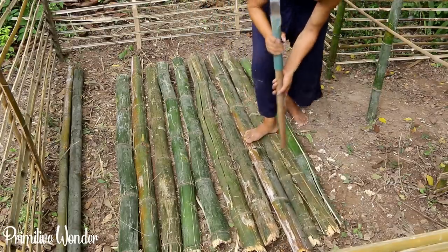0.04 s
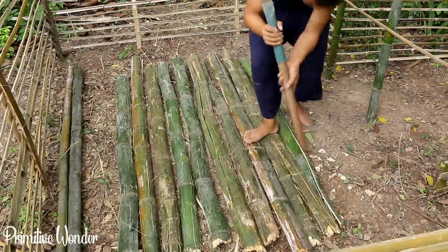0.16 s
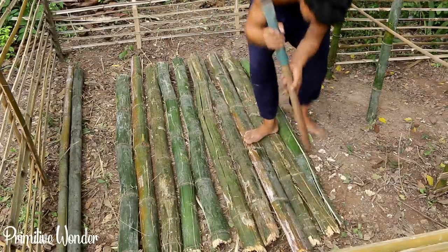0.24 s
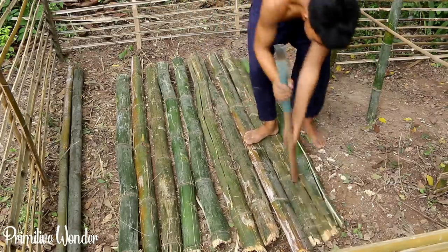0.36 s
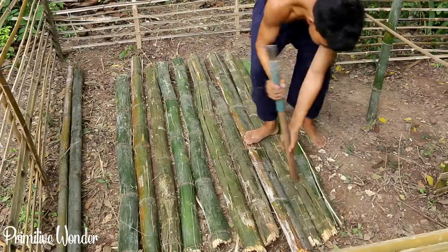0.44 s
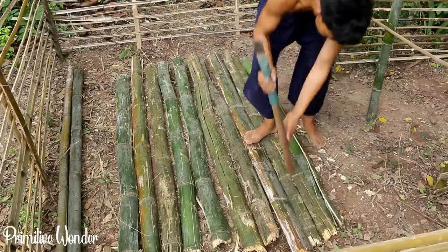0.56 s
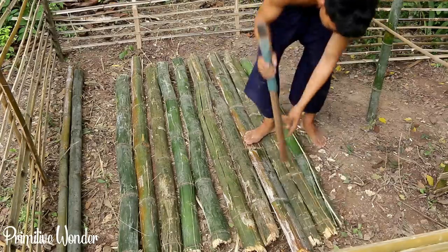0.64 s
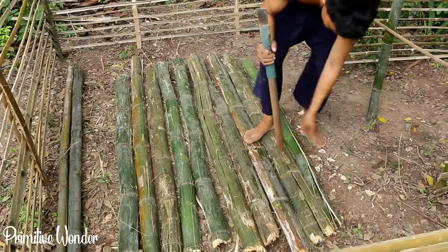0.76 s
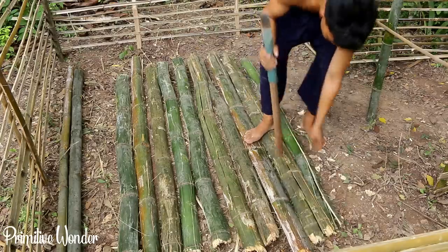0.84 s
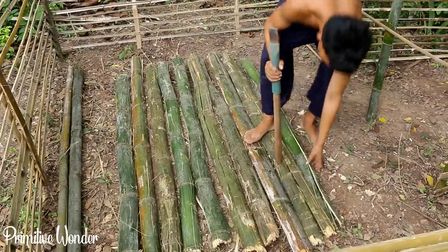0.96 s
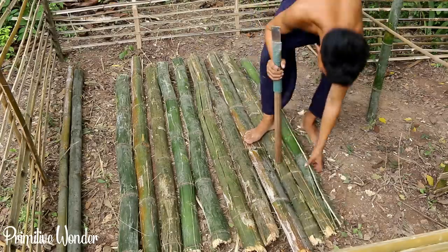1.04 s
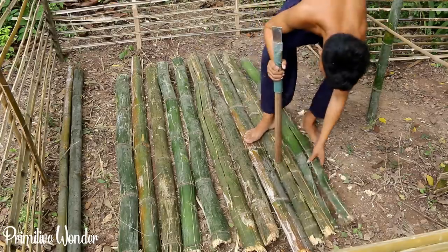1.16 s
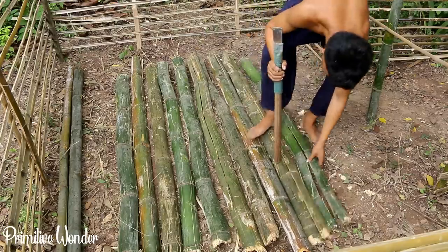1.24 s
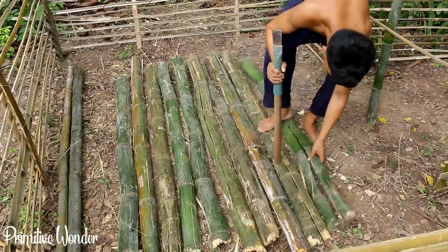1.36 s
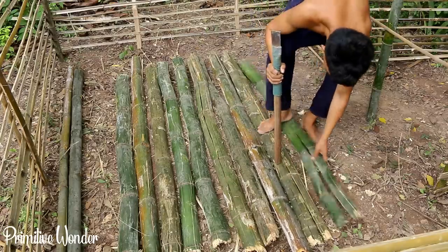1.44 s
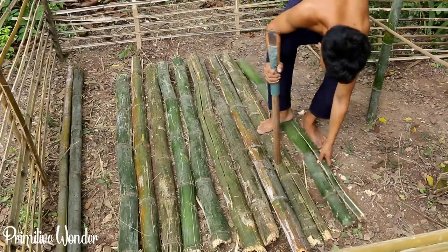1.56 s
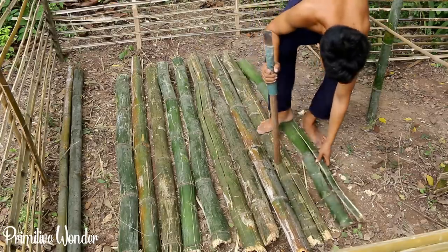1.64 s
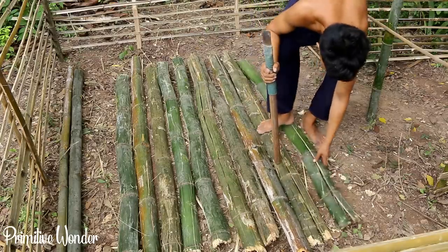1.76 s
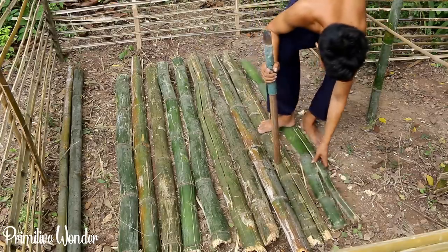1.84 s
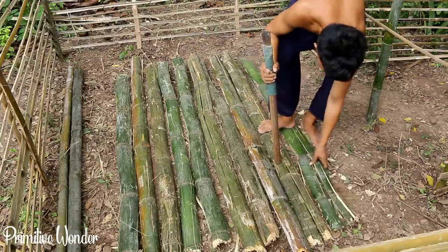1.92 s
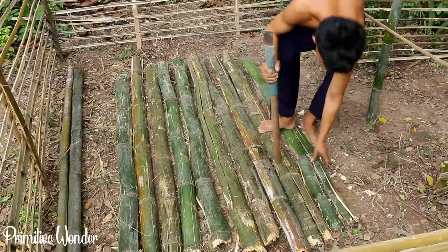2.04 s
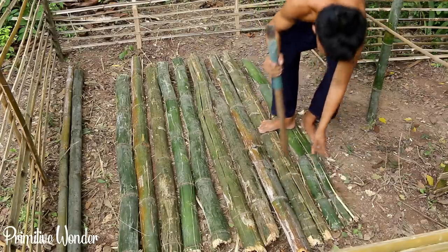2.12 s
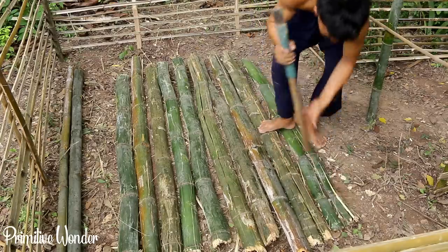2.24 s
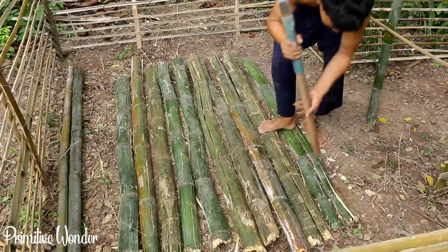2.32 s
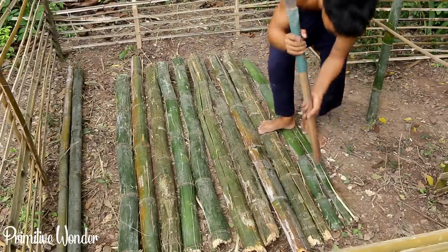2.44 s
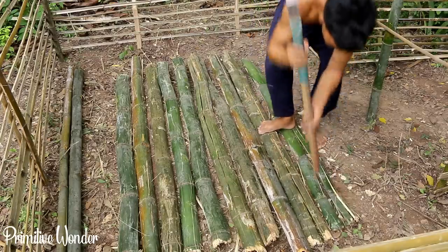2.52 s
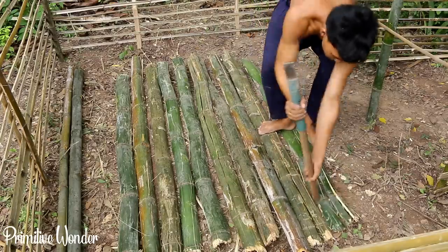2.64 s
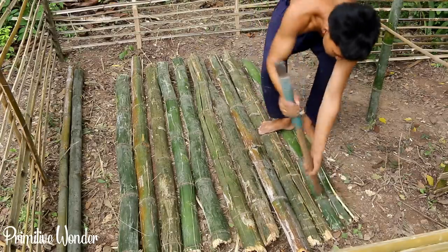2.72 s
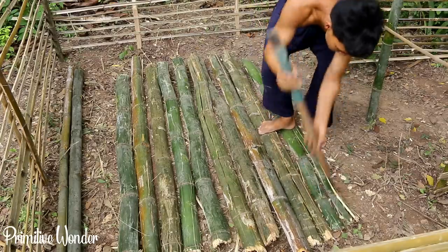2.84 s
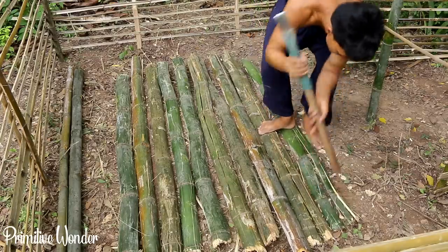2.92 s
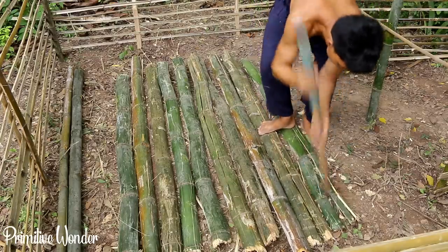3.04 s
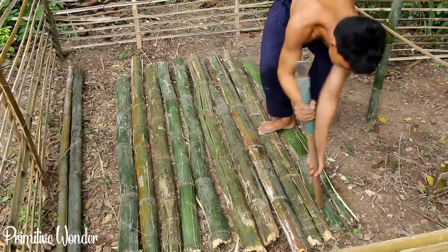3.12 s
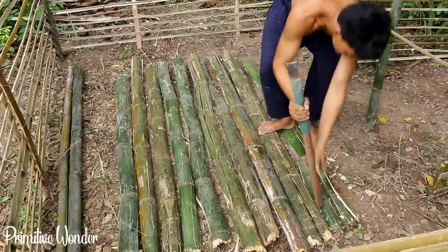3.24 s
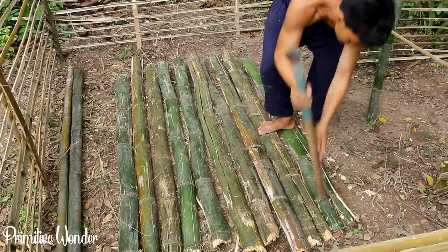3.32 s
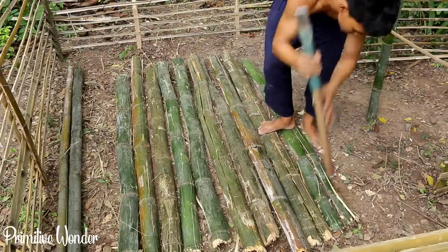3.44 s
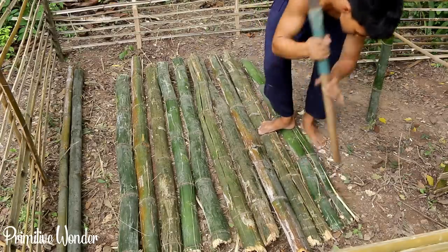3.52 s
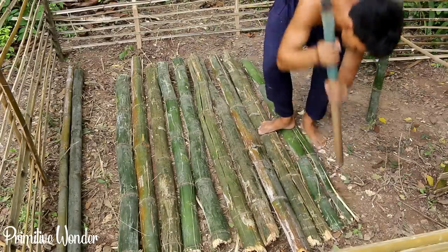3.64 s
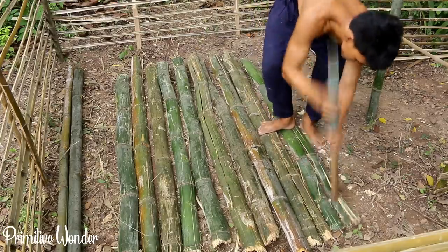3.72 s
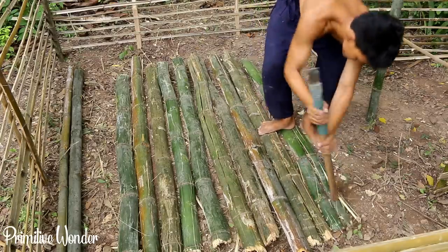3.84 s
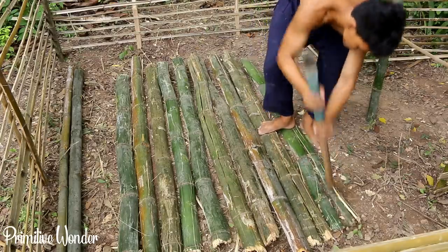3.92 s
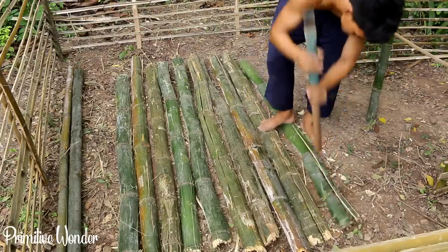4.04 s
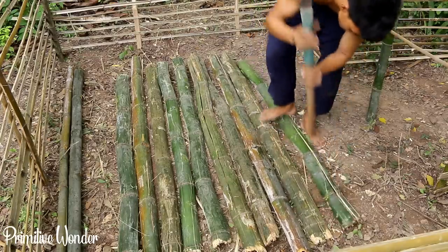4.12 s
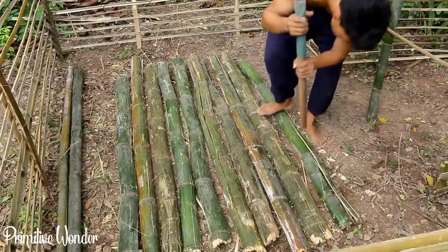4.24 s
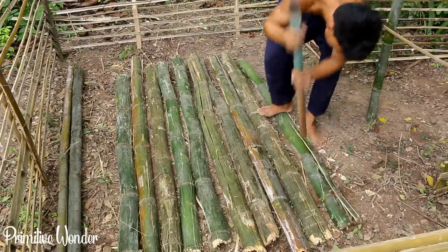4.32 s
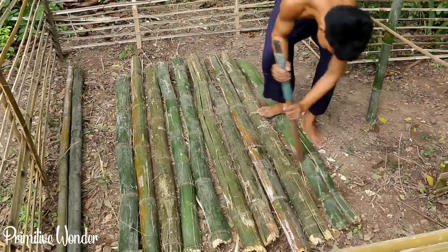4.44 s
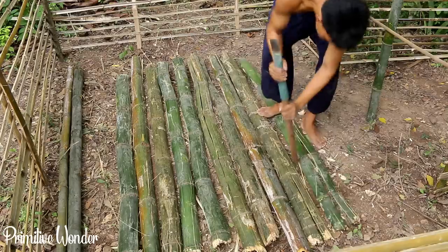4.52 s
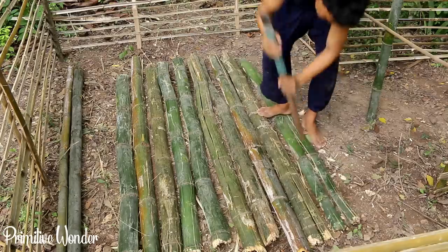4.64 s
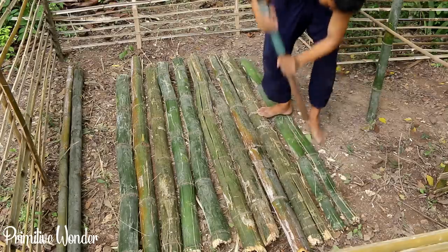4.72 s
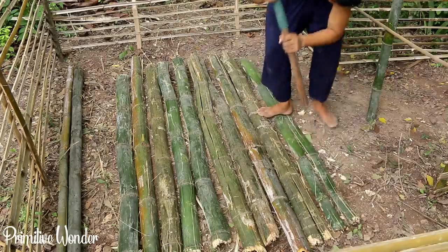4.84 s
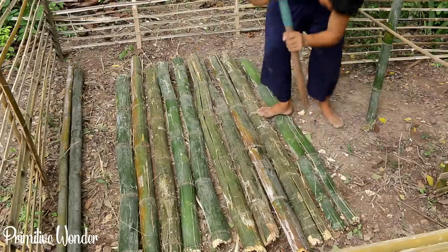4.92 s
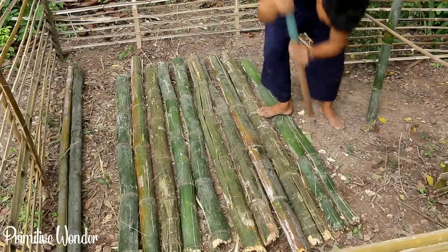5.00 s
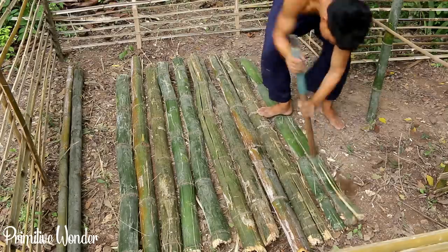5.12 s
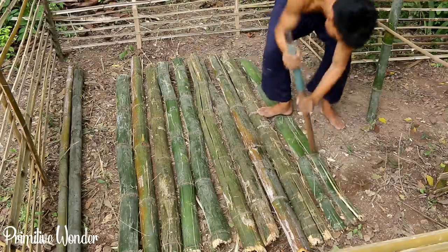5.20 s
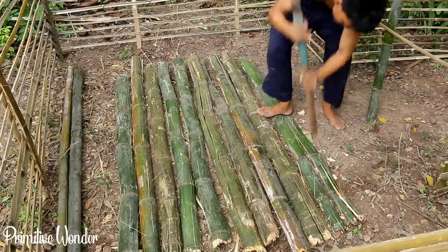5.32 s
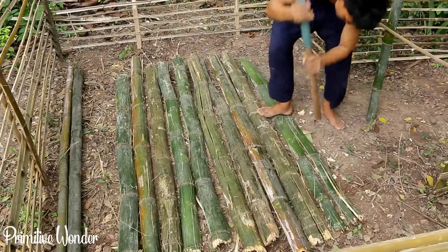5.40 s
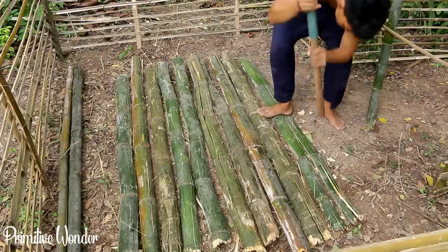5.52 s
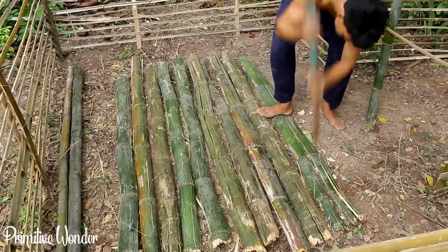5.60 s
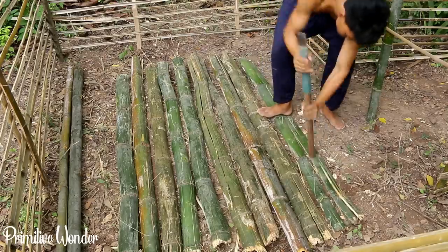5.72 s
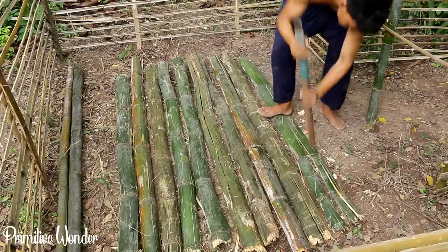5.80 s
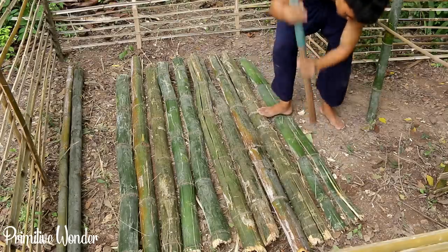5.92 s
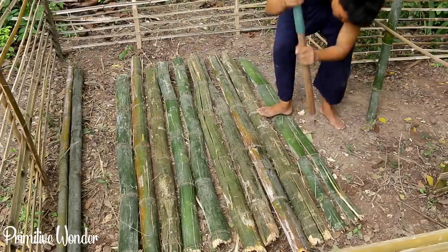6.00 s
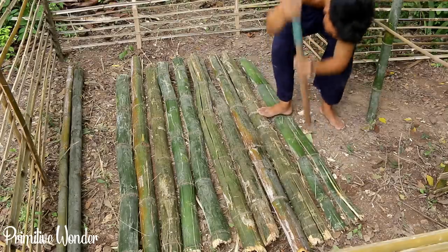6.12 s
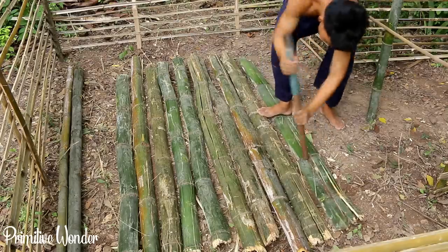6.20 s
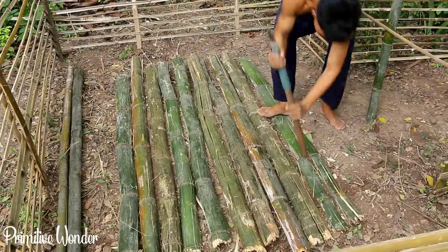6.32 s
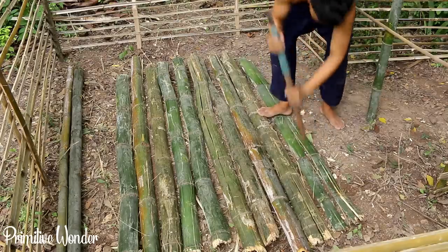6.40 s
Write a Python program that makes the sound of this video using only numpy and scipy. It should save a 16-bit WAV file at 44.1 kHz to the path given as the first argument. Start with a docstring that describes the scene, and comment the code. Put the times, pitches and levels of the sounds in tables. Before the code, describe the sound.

Loud, dry bamboo chops outdoors, miked close in stereo and slightly to the right. A strong crack and a lighter one come first, then dry leaves shuffle while a bird chips about every quarter second. From the middle onward blows land in steady rhythm, woody and splintery, with poles rattling between them. Brief scattered reflections and distant twittering surround the work; the loudest peaks may distort.

```python
"""Chopping green bamboo

A long-handled steel blade is driven nine times into green bamboo poles on bare earth, close by on the right.
Each chop layers crack, noise splinters, damped pole and blade modes and a ground thump; echo tails answer it.
Between chops poles tap and ring, and dry leaves rustle in enveloped noise grains.
Gliding whistles and narrow-band noise make the birds; shaped noise makes the open air. The peaks can clip."""
import sys
import numpy as np
from scipy import signal
from scipy.fft import rfft, irfft
from scipy.io import wavfile
from scipy.ndimage import uniform_filter1d

SR = 44100
rng = np.random.default_rng(int(sys.argv[2]) if len(sys.argv) > 2 else 0)


def int16_out(signal):
    """Quantize to a 16-bit WAV file."""
    q = np.round(np.clip(np.atleast_2d(signal).T, -1, 1) * 32767)
    wavfile.write(sys.argv[1], SR, q.astype(np.int16))


N = 284886

# Band centres of a chop: (frequency [Hz])
CHOP_BANDS = [150, 450, 950, 1500, 2600, 5000, 11000]
# Chops: (time [s], seven band levels before the chop trim [dB], pole pitch [factor], thump pitch [Hz],
# splintering [dB], send into the yard [dB])
CHOPS = [ (0.3433, -31.5, -27, -24, -26.5, -22, -28, -31.5, 0.98, 197, 9.5, -0.56),
         (0.9167, -53, -44.5, -27, -30.5, -25.5, -30.5, -46.5, 1.01, 150, 2, -2.7),
         (2.5939, -27.5, -33.5, -31.5, -23, -24, -34, -41.5, 1.03, 170, 1.5, -1.2),
         (3.0787, -32.5, -28, -30.5, -25, -22.5, -30, -37.5, 0.93, 182, -3, 0),
         (3.728, -30.5, -27, -26, -22.5, -23.5, -33.5, -38.5, 0.91, 151, -3.5, -0.36),
         (4.379, -38.5, -26, -24.5, -25, -26, -31.5, -36.5, 1.03, 132, 7, -0.66),
         (5.0934, -31, -25.5, -25, -20.5, -25, -33, -36.5, .95, 182, 5, -1.6),
         (5.6346, -27, -25.5, -24, -27, -21.5, -28, -35.5, 0.96, 237, 3, -2.2),
         (6.195, -29, -21.5, -23.5, -24, -26.5, -30, -37, 1.09, 158, 11.5, -0.36)]
# Hollow pole modes before the pitch factor: (frequency [Hz], relative level [dB], T60 [s])
POLE_MODES = [(240, -4, 0.059), (510, 6.5, 0.052), (789, 2, 0.034), (997, 5.5, 0.045), (1426, -0.5, 0.028),
              (2222, -5, 0.025), (2735, -12.5, 0.056)]
# Steel blade modes: (frequency [Hz], relative level [dB], T60 [s])
BLADE_MODES = [(3960, -4, 0.16), (4970, 4, 0.28), (6630, -11, 0.2), (7100, -13, .16), (9600, -15, .12),
               (9910, -14, .12)]
# Splitting fibres, a row per chop band: (level before each chop's splintering [dB], T60 [s])
SPLINTERS = [(-4, 0.093), (1, 0.055), (0, 0.032), (-8, 0.042), (-12.5, 0.1), (17, 0.057), (38, 0.04)]
# Band centres of a knock: (frequency [Hz])
KNOCK_BANDS = [450, 1300, 3800, 10000]
# Pole taps and snaps: (time [s], peak band level before the knock trim [dB], strongest frequency [Hz])
# A low strongest frequency gives a soft bump, a high one a dry snap.
KNOCKS = [(0.08, -49.5, 8000), (0.267, -42, 4500), (0.51, -44.5, 704), (0.623, -35.5, 2100),
          (0.638, -43, 1600), (0.688, -43.5, 5800), (0.787, -48.5, 3200), (1.234, -59, 1200),
          (1.252, -47, 650), (2.062, -55.5, 3800), (3.035, -44, 520), (3.88, -50.5, 11000),
          (4.285, -47.5, 350), (4.425, -37.5, 850), (4.455, -45, 500), (4.475, -41.5, 1000),
          (4.507, -47, 1400), (4.631, -49, 10000), (4.641, -49.5, 7500), (4.698, -54.5, 3600)]
KNOCK_BELOW_DB, KNOCK_ABOVE_DB = 7, 8.5  # fall per octave below and above the strongest frequency

# Colours of near scatter, fence echo and far woods: (frequency [Hz], level [dB])
SCATTER = [(100, -5.5), (500, -17), (1200, -12.5), (2600, -11), (5000, -5.5), (11000, -3.5), (15000, -6)]
FENCE = [(100, -19.5), (500, -20), (1200, -16.5), (2600, -18), (5000, -16), (11000, -29.5)]
WOODS = [(100, -35), (600, -32), (1200, -29.5), (2600, -23), (5000, -25), (11000, -28)]
# Their decays: (frequency [Hz], T60 [s])
SCATTER_T60 = [(100, 0.33), (600, 0.16), (2500, 0.23), (6000, 0.32), (12000, 0.26)]
FENCE_T60 = [(100, 0.11), (600, 0.21), (2500, 0.16), (6000, 0.26), (12000, .3)]
WOODS_T60 = [(500, 0.46), (6000, 0.66)]
# Left-right likeness of reflections, then of the air: (frequency [Hz], likeness [-1 to 1])
YARD_SAME = [(100, 1), (640, 0.97), (1400, 0.78), (3100, 0.16), (6800, 0)]
AIR_SAME = [(60, 1), (290, 0.84), (640, 0.67), (1400, 0.52), (3100, -0.037), (6800, -0.26), (15000, 0.38)]
# Shading of the work on the right: (frequency [Hz], left minus right [dB])
SHADE = [(100, -1.8), (1000, -.8), (2400, -3), (4400, -3.8), (8000, -5.5), (15000, -8)]
LAG = 1.8  # left port behind right [samples]

# Whistle shapes: (length [s], top_hz before pitch factor [Hz], floor_hz before pitch factor [Hz],
# glide_s time constant [s], crest [share of length])
CHIP = dict(length=0.05, top_hz=5540, floor_hz=2210, glide_s=0.02, crest=0.11)
SLUR = dict(length=0.13, top_hz=4500, floor_hz=1400, glide_s=0.11, crest=0.55)
WHISTLE = dict(length=.24, top_hz=2980, floor_hz=940, glide_s=.185, crest=0.07)
# Their calls: (time [s], level before the trees [dB], pitch [factor])
CHIPS = [(0.103, -39.5, 0.96), (0.601, -41, 0.94), (.868, -39.5, 0.93), (1.157, -42, 0.98),
         (1.424, -40.5, 0.89), (1.686, -40.5, 1), (1.95, -39.5, 0.99), (2.23, -40.5, 1), (2.522, -41, 0.97),
         (2.811, -40.5, 1), (5.518, -40.5, 0.89), (5.794, -39, 0.99), (6.059, -40, 0.93),
         (6.34, -39.5, 0.99)]
SLURS = [(.468, -47, 1), (1.257, -47.5, 1), (1.999, -46, 1), (2.825, -47.5, 1), (4.804, -58, 1)]
WHISTLES = [(3.383, -42, 0.98)]
# Calls blurred by the trees, the 9.7 kHz row being the high trill once more: (time [s], length [s], pitch [Hz],
# width [Hz], level [dB])
FAR_CALLS = [(1.386, 0.16, 7550, 700, -57.5), (1.44, 0.11, 4750, 900, -53), (2.438, 0.13, 5900, 595, -58.5),
             (3.127, 0.14, 9700, 650, -54), (3.319, 0.23, 6180, 700, -61), (3.58, 0.69, 3064, 600, -54.5),
             (4.02, 0.23, 3830, 896, -50), (4.232, .14, 4330, 700, -49)]
# Thin, very high trill: (s start [s], length [s], rate [notes/s], hz pitch [Hz],
# sweep_hz fall over two thirds of a note [Hz], db level before the trees [dB])
TRILL = dict(s=.134, length=.122, rate=55, hz=9700, sweep_hz=600, db=-52)
# Distant twitter: a phrase rises and falls in pitch, while its level wanders on its own.
PHRASE_S, PHRASE_TOP_S = .505, .125  # repeat time and first crest
TWITTER_HZ, TWITTER_SWING_HZ, TWITTER_WANDER_HZ = 5480, 150, 40
TWITTER_DB, TWITTER_WANDER_DB = -63.5, 2

# Feet and poles shifting over dry leaves and grit: (time [s], length [s], level [dB])
SHUFFLES = [(0, 0.58, -58.5), (0.51, 0.37, -47.5), (1.071, 0.41, -51.5), (1.36, 0.32, -53),
            (1.578, 0.75, -60.5), (3.76, 0.6, -57), (4.25, 0.66, -61), (5.308, 0.34, -62)]
SHUFFLE_RISE, SHUFFLE_FALL = 0.32, 0.58  # shares of a shuffle's length
LEAVES_DB = -67.5  # the leaf litter between shuffles
# Colour of the open air: (frequency [Hz], relative density [dB per Hz])
AIR = [(25, -24), (45, 0.5), (70, 1.5), (120, -3), (250, -8), (600, -12.5), (880, -16), (1010, -11.5),
       (1200, -18), (1900, -20.5), (2900, -16.5), (6500, -26), (11000, -30), (16000, -40)]
AIR_DB = -51
EDGE_HZ = 15900  # upper band limit

# Clock of one blow, with room for what comes before contact
LEAD = 512  # samples before contact
AGE = (np.arange(8192) - LEAD) / SR  # seconds since contact
BLOW_SAMPLES = .03 * SR  # span that the levels of a blow refer to


def amp(db):
    """Decibels to gain."""
    return 10 ** (np.asarray(db) / 20)


def evened(x):
    """Scales to rms 1."""
    return x / np.sqrt(np.mean(x ** 2) + 1e-20)


def unit(x):
    """Scales to energy 1."""
    return x / (np.linalg.norm(x) + 1e-12)


def read(points, hz):
    """Reads a curve on a log-frequency axis."""
    f, value = np.transpose(points)
    return np.interp(np.log(hz + 1), np.log(f), value)


def add(mix, s, sound):
    """Mixes a sound in at time s, in place."""
    part = mix[max(round(s * SR), 0):][:len(sound)]
    part += sound[:len(part)]


def freqs(x):
    """The frequencies of a sound's spectrum."""
    return np.fft.rfftfreq(x.shape[-1], 1 / SR)


def shaped(x, gain):
    """Filters by a gain for each frequency."""
    return irfft(rfft(x) * gain, x.shape[-1])


def band(x, centres, index):
    """One of a set of overlapping bands that sum to the whole sound."""
    weights = np.eye(len(centres))[index]
    return shaped(x, read(list(zip(centres, weights)), freqs(x)))


def diffuse(pair, likeness):
    """Blends two unrelated signals to the left-right likeness of sound from all sides."""
    same = np.clip(read(likeness, freqs(pair)), -1, 1)
    right = shaped(pair[0], same) + shaped(pair[1], np.sqrt(1 - same ** 2))
    return np.array([pair[0], right])


def wander(slow, fast):
    """Slow chance of rms 1, summed from sines between two rates [Hz]."""
    t = np.arange(N) / SR
    rates = np.geomspace(slow, fast, 20)
    return evened(sum(np.sin(2 * np.pi * (f * t + rng.random())) / np.sqrt(f) for f in rates))


def tail(colour, t60s, delay, rise, clump_db=0):
    """Scattered reflections arrive in clumps after a delay and die band by band; colour sets their energy."""
    taps, clumps = rng.standard_normal((2, SR)), rng.standard_normal(SR)
    clumps = evened(uniform_filter1d(clumps, int(0.0046 * SR)))
    size = evened(amp(clump_db * np.clip(clumps, -2, 2)))
    hz, t, z = signal.stft(taps * size, SR, nperseg=256)
    swell = np.clip((t - delay) / rise, 0, 1)
    fade = swell * amp(-60 * np.maximum(t - delay - rise, 0) / read(t60s, hz)[:, None])
    # Equal energy in every band before colouring
    fade /= np.sqrt((fade ** 2).mean(1, keepdims=True) * SR)
    coloured = z * fade * amp(read(colour, hz))[:, None]
    return diffuse(signal.istft(coloured, SR, nperseg=256)[1], YARD_SAME)


def heard(x, response):
    """Convolves a sound with a two-port response."""
    return signal.fftconvolve(x[None], response, axes=1)[:, :N]


def air(swell_db=1):
    """Open air: noise shaped into low rumble and soft hiss, swelling slowly."""
    noise = diffuse(rng.standard_normal((2, N)), AIR_SAME)
    colour = amp(read(AIR, freqs(noise)))
    return amp(AIR_DB + swell_db * wander(0.386, 7)) * evened(shaped(noise, colour))


def rustle(per_s=550, spread_db=2.5):
    """Dry leaves crackle in grains a couple of milliseconds long that swell and fade with every shuffle."""
    struck = rng.random(N) < per_s / SR
    size = amp(spread_db * np.minimum(rng.exponential(1, N), 4)) * struck
    envelope = signal.lfilter([1], [1, -np.exp(-1 / (0.0022 * SR))], size)
    grains = envelope * rng.standard_normal(N)
    colour = [(100, -19), (500, 5.0), (1500, 0.5), (4000, -2), (9000, -8), (16000, -17.5)]
    pressure = np.full(N, amp(LEAVES_DB))
    for s, length, db in SHUFFLES:
        u = np.linspace(0, 1, int(length * SR))
        swell = np.clip(np.minimum(u / SHUFFLE_RISE, (1 - u) / SHUFFLE_FALL), 0, 1)
        add(pressure, s, amp(db) * swell)
    return evened(shaped(grains, amp(read(colour, freqs(grains))))) * pressure


def blurred(hz, width):
    """Foliage smears a whistle into a narrow band of noise, different at each port."""
    smooth = signal.butter(2, width / 2, fs=SR, output="sos")
    a, b = signal.sosfilt(smooth, rng.standard_normal((2, 2, len(hz))))
    turn = 2 * np.pi * np.cumsum(hz) / SR
    return evened(a * np.cos(turn) + b * np.sin(turn))


def far_birds(twitter_width=420):
    """Deep in the trees: a twitter that repeats its pitch phrase, and single blurred calls."""
    phrase = np.cos(2 * np.pi * (np.arange(N) / SR - PHRASE_TOP_S) / PHRASE_S)
    pitch = TWITTER_HZ + TWITTER_SWING_HZ * phrase + TWITTER_WANDER_HZ * wander(0.37, 2.9)
    out = blurred(pitch, twitter_width) * amp(TWITTER_DB + TWITTER_WANDER_DB * wander(1, 6))
    for start, length, hz, width, db in FAR_CALLS:
        u = np.linspace(0, 1, int(length * SR))
        call = blurred(np.full(len(u), hz), width) * amp(db) * np.sin(np.pi * u ** 0.58)
        for port, sound in zip(out, call):
            add(port, start, sound)
    return out


def dying(t60):
    """An exponential decay that starts at the moment of contact."""
    return (AGE >= 0) * amp(-60 * abs(AGE) / t60)


def ring(modes, pitch):
    """Damped sine modes struck at the moment of contact."""
    return unit(sum(amp(db) * dying(t60) * np.sin(2 * np.pi * hz * pitch * AGE) for hz, db, t60 in modes))


def crack(width):
    """A sharp push and pull of the air."""
    return unit(-AGE * np.exp(-(AGE / width) ** 2))


def fibres(clump_db):
    """A dense noise run of tiny fractures of uneven size."""
    size, click = rng.standard_normal((2, len(AGE)))
    return click * amp(clump_db * evened(uniform_filter1d(size, 24)))


def knock(row, t60=0.031, tick_db=-5, pole_db=-8):
    """Poles touch lightly: a tick and a short rattle ring the pole modes."""
    s, level_db, hz = row
    touch = unit(fibres(3.9) * dying(t60)) + amp(tick_db) * crack(.00007)
    sound = touch + amp(pole_db) * ring(POLE_MODES, rng.uniform(.85, 0.91))
    octaves = np.log2(np.array(KNOCK_BANDS) / hz)
    levels_db = level_db - np.maximum(-KNOCK_BELOW_DB * octaves, KNOCK_ABOVE_DB * octaves)
    bands = [amp(db) * unit(band(sound, KNOCK_BANDS, k)) for k, db in enumerate(levels_db)]
    return sum(bands) * np.sqrt(BLOW_SAMPLES)


def calls(shape, rows):
    """Near-pure whistles that swell, fade and slide from a top pitch towards a floor."""
    t, out = np.arange(0, shape["length"], 1 / SR), np.zeros(N)
    fall_hz = shape["top_hz"] - shape["floor_hz"]
    hz = shape["floor_hz"] + fall_hz * np.exp(-t / shape["glide_s"])
    swell = np.interp(t / shape["length"], [0, np.clip(shape["crest"], 0, 1), 1], [0, 1, 0])
    for start, level_db, pitch in rows:
        chance = evened(uniform_filter1d(rng.standard_normal(8192 * 2), 150))[:len(t)]
        waver = 1 + 0.0153 * chance
        tone = np.sin(2 * np.pi * np.cumsum(hz * pitch * waver) / SR)
        add(out, start, tone * amp(level_db) * np.sin(np.pi / 2 * swell))
    return out


def trill(s, length, rate, hz, sweep_hz, db):
    """A quick run of very high falling notes, with a gap after each."""
    cycle, out = np.arange(0, length, 1 / SR) * rate % 1, np.zeros(N)
    tone = np.sin(2 * np.pi * np.cumsum(hz + sweep_hz * (1 - 3 * cycle) / 2) / SR)
    add(out, s, amp(db) * tone * np.sin(np.pi * np.minimum(cycle / 0.7, 1)) ** 2)
    return out


def through_trees(song, direct_db, wet_db, t60):
    """A call comes straight, by close paths that break up its sweep, and as a long wash from the forest."""
    flat = [(1500, 0), (6000, 0)]
    paths = tail(flat, [(1500, .03), (6000, .03)], .001, .002)
    forest = tail(flat, [(1500, t60), (6000, t60)], 0.0058, 0.014)
    return amp(direct_db) * song + heard(song, amp(direct_db + 4.5) * paths + amp(wet_db) * forest)


def birds():
    """Sharp chips and a low whistle from far off; slurred whistles and a trill from nearer; blurred far birds."""
    far = through_trees(calls(CHIP, CHIPS) + calls(WHISTLE, WHISTLES), direct_db=-10, wet_db=-2, t60=0.56)
    near = through_trees(calls(SLUR, SLURS) + trill(**TRILL), direct_db=-3, wet_db=-1.5, t60=.5)
    return far + near + far_birds()


def chop(row, snap_db=-1.5, pole_db=0, blade_db=-17, thump_delay=0.0119, thump_width=0.0049,
         thump_db=8, bite_db=-15, bite_time=0.00049):
    """The edge bites, the wall cracks and splinters, the pole rings, and a moment later it thumps the earth."""
    s, *levels_db, pitch, thump_hz, splinter_db, yard_db = row
    snap, tear, pole = crack(.00005), fibres(3.7), ring(POLE_MODES, pitch)
    # The bite swells up to the contact
    bite = fibres(0.57) * (AGE < 0) * np.exp(-abs(AGE) / bite_time)
    late = AGE - thump_delay
    thump = -np.cos(2 * np.pi * thump_hz * late) * np.exp(-(late / thump_width) ** 2)
    out = np.zeros(len(AGE))
    for k, (db, (tear_db, t60)) in enumerate(zip(levels_db, SPLINTERS)):
        parts = [(snap, snap_db), (tear * dying(t60), tear_db + splinter_db), (bite, bite_db)]
        # Thump in the lowest band only, pole in the bands its modes reach
        if k == 0:
            parts.append((thump, thump_db))
        elif CHOP_BANDS[k] < POLE_MODES[-1][0] * np.sqrt(2):
            parts.append((pole, pole_db))
        blend = sum(amp(part_db) * unit(band(x, CHOP_BANDS, k)) for x, part_db in parts)
        out += amp(db) * unit(blend)
    # The blade follows the level of the second-highest band
    steel = amp(levels_db[-2] + blade_db) * ring(BLADE_MODES, 1)
    return (out + steel) * np.sqrt(BLOW_SAMPLES)


def spread(row, blade_db=-14):
    """A chop's send to the yard: a smooth burst at the same band levels, with the ring of the steel."""
    s, *levels_db, pitch, thump_hz, splinter_db, yard_db = row
    burst = sum(amp(db) * unit(band(crack(.00003), CHOP_BANDS, k)) for k, db in enumerate(levels_db))
    steel = amp(levels_db[-2] + blade_db) * ring(BLADE_MODES, 1.0)
    return amp(yard_db) * (burst + steel) * np.sqrt(BLOW_SAMPLES)


def yard(x, count=3):
    """Scatter off poles and ground, fence slap and faint woods; near paths and fence cycle from chop to chop."""
    place = np.searchsorted(np.array(CHOPS)[:, 0] - .02, np.arange(N) / SR) % count
    woods, out = tail(WOODS, WOODS_T60, 0.082, 0.04), np.zeros((2, N))
    for k in range(count):
        near = tail(SCATTER, SCATTER_T60, 0.0024, 0.0021, clump_db=1.5)
        fence = tail(FENCE, FENCE_T60, 0.044, 0.021, clump_db=2.0)
        out += heard(x * (place == k), near + fence + woods)
    return out


def from_right(x):
    """The left port hears the work slightly later and duller."""
    hz = freqs(x)
    half_shade_db = read(SHADE, hz) / 2
    left = shaped(x, amp(half_shade_db) * np.exp(-2j * np.pi * hz * LAG / SR))
    return np.array([left, shaped(x, amp(-half_shade_db))])


def scene(chop_db=0.5, knock_db=1):
    """The work close by on the right, yard, birds and air all around."""
    work = rustle()
    for row in KNOCKS:
        add(work, row[0] - LEAD / SR, amp(knock_db) * knock(row))
    outward = work.copy()
    for row in CHOPS:
        add(work, row[0] - LEAD / SR, amp(chop_db) * chop(row))
        add(outward, row[0] - LEAD / SR, spread(row))
    around = yard(outward) + birds() + air()
    # The surroundings lean slightly right
    return from_right(work) + around * amp([[-.9], [.9]])


def record(dry):
    """Peaks beyond full scale clip; then come the low cut and the band limit."""
    clipped = np.clip(dry, -1, 1)
    thinned = signal.sosfilt(signal.butter(4, 44, "highpass", fs=SR, output="sos"), clipped)
    lowpass = signal.firwin(255, EDGE_HZ, window=("kaiser", 8), fs=SR)
    return signal.oaconvolve(thinned, lowpass[None], "same")


dry = scene()
out = record(dry)
int16_out(out)
```